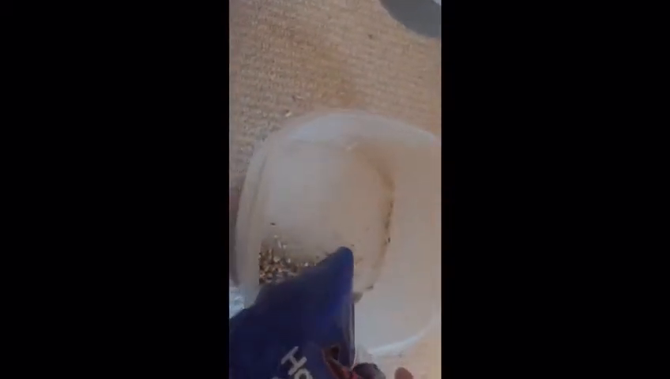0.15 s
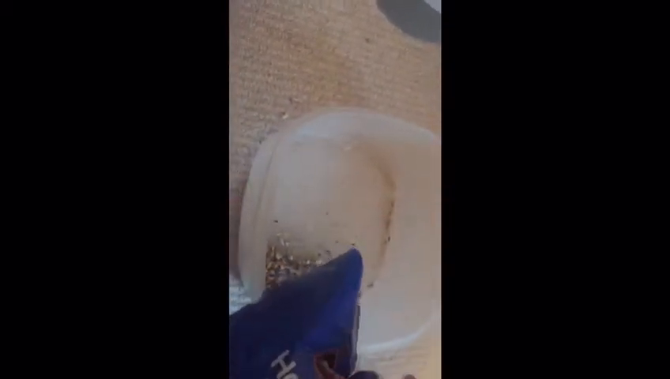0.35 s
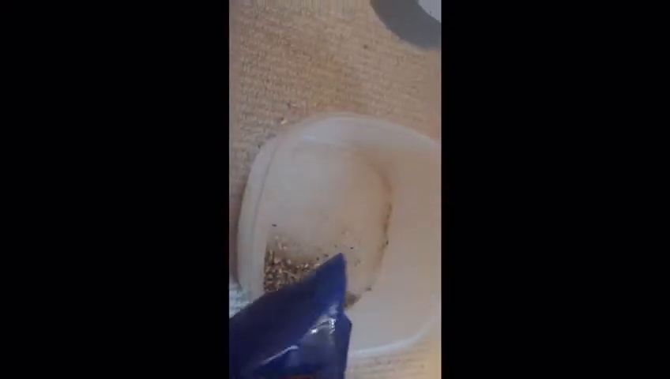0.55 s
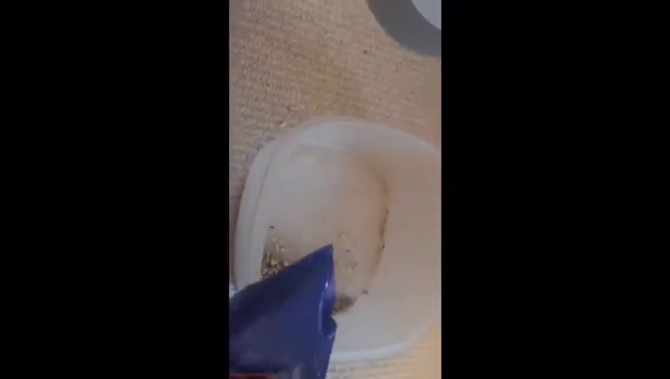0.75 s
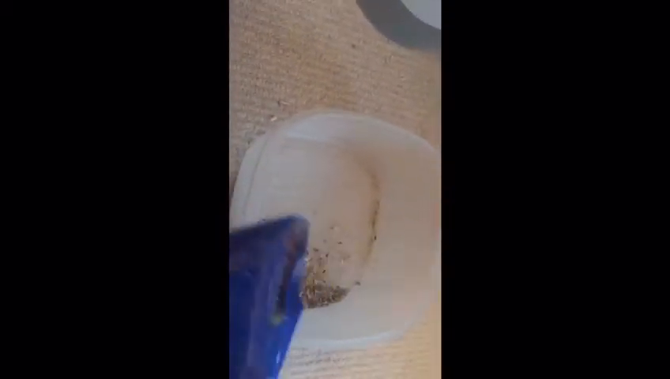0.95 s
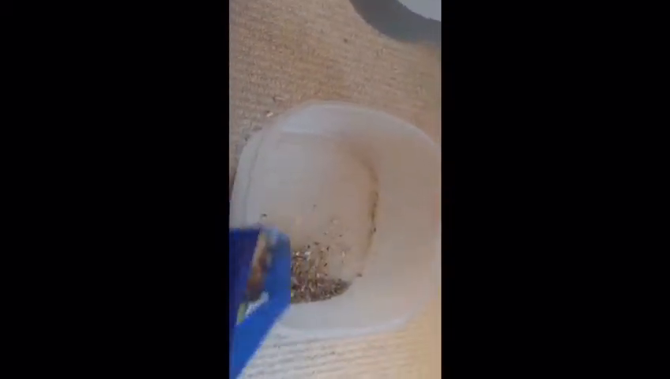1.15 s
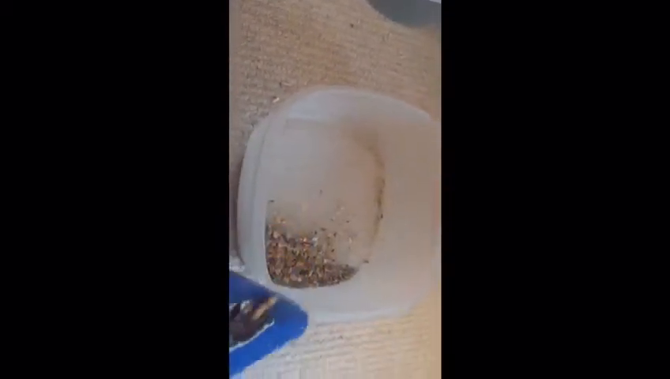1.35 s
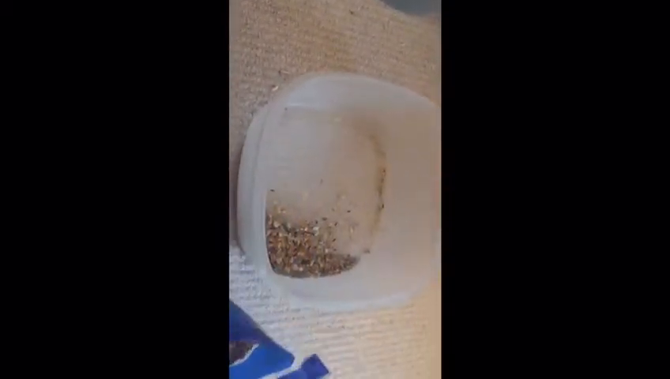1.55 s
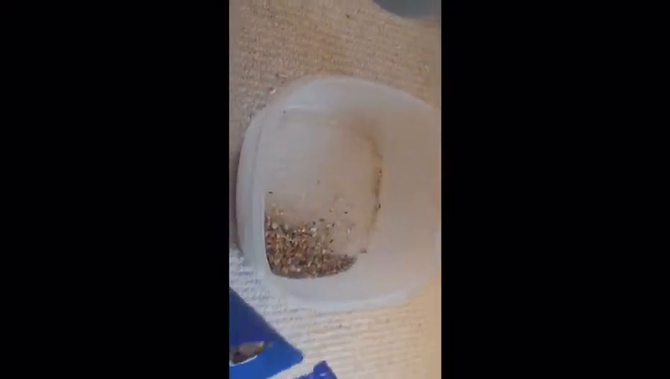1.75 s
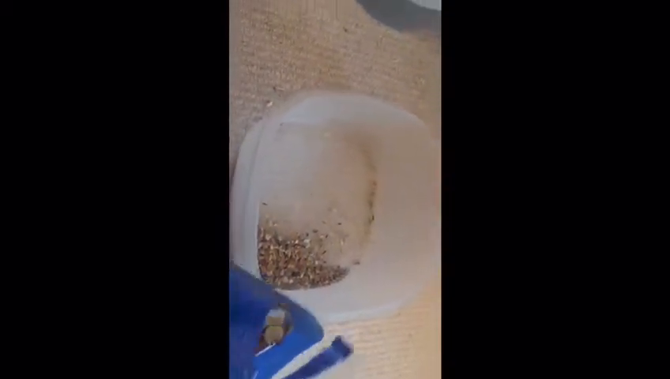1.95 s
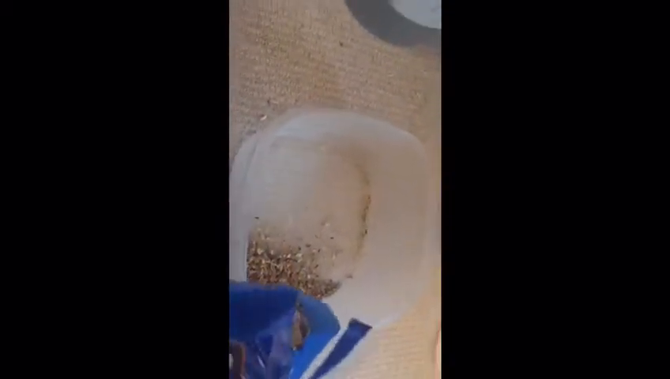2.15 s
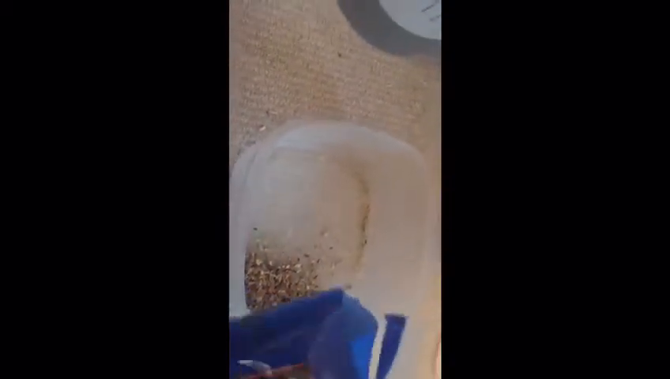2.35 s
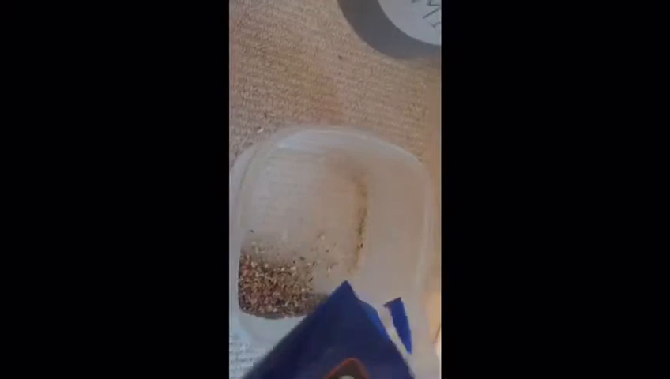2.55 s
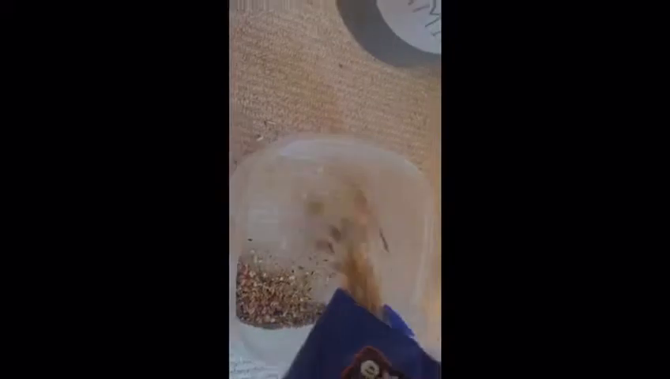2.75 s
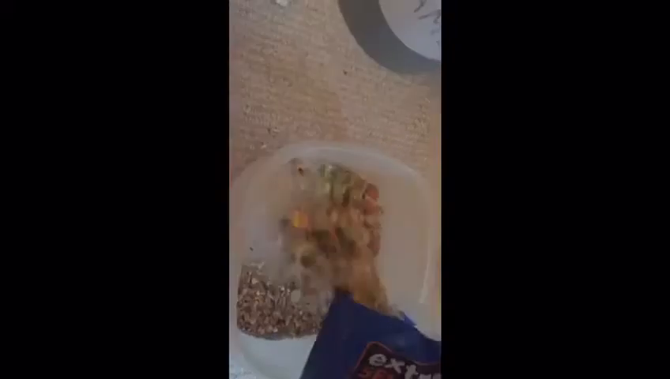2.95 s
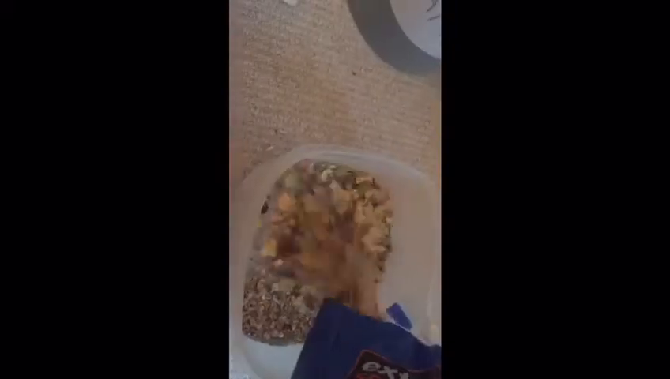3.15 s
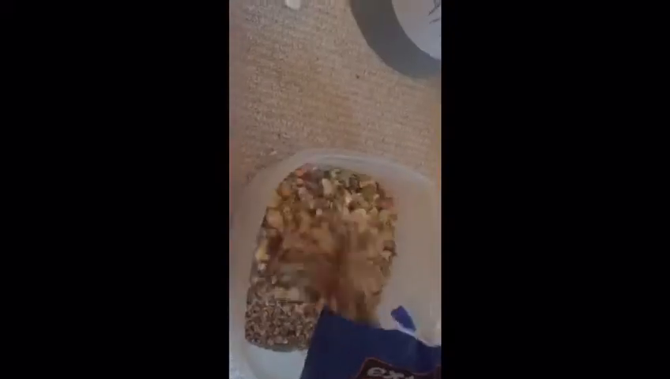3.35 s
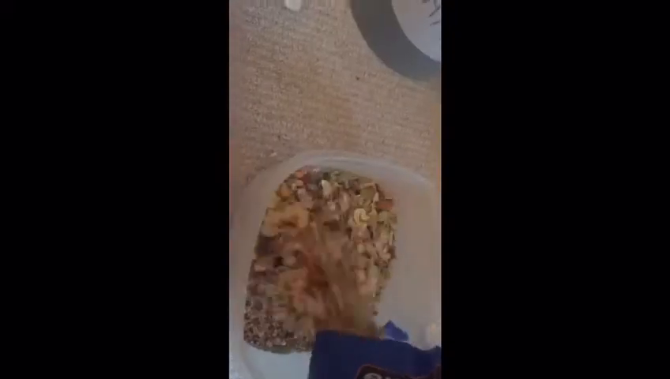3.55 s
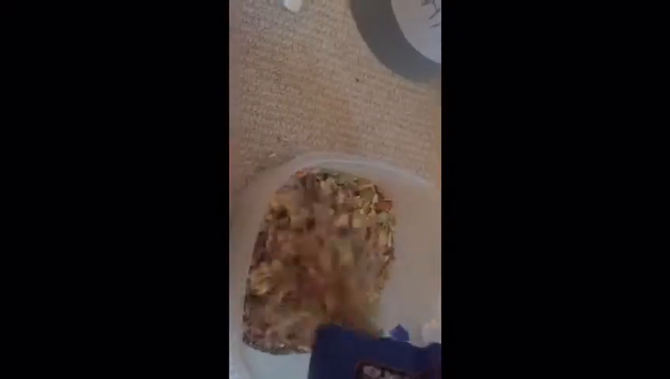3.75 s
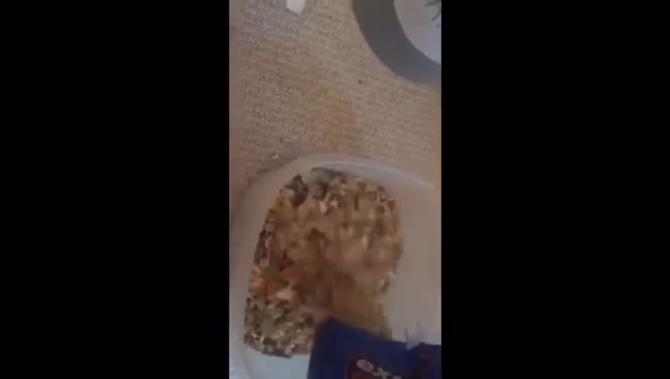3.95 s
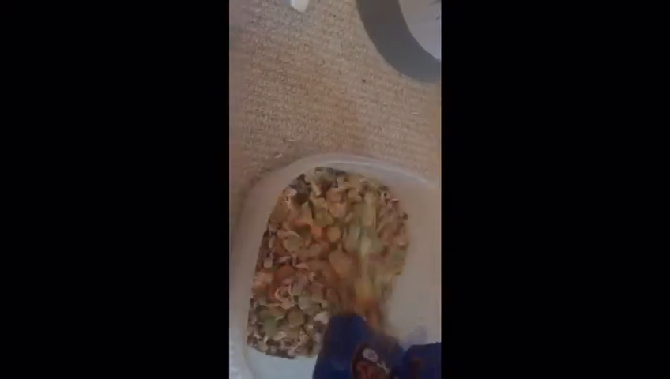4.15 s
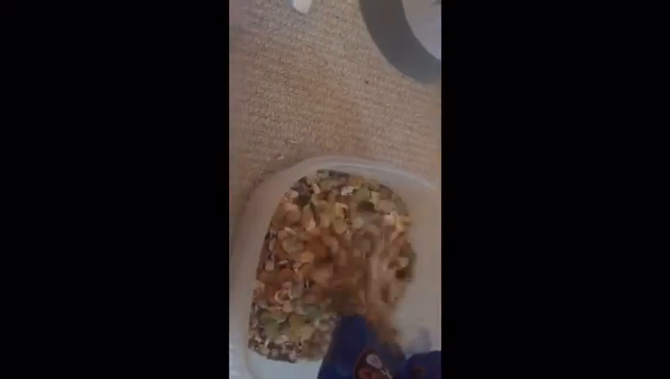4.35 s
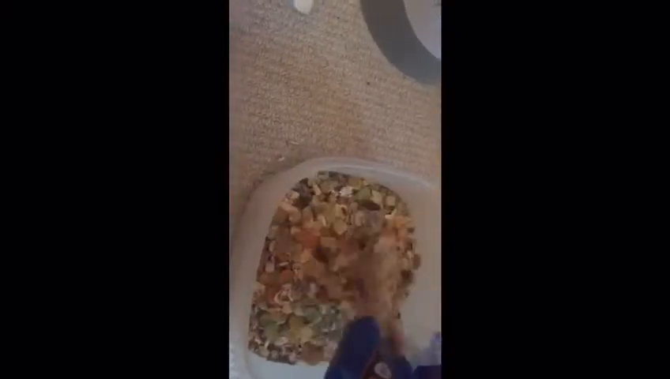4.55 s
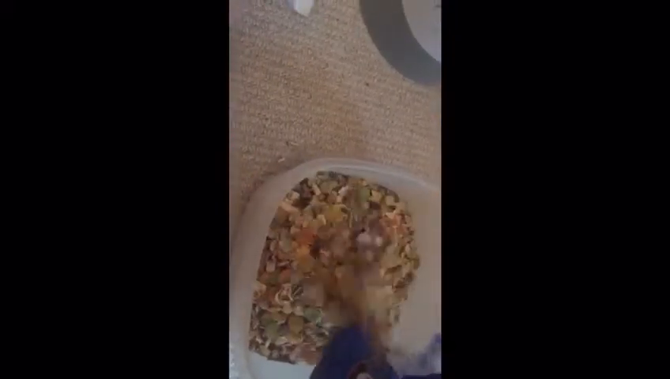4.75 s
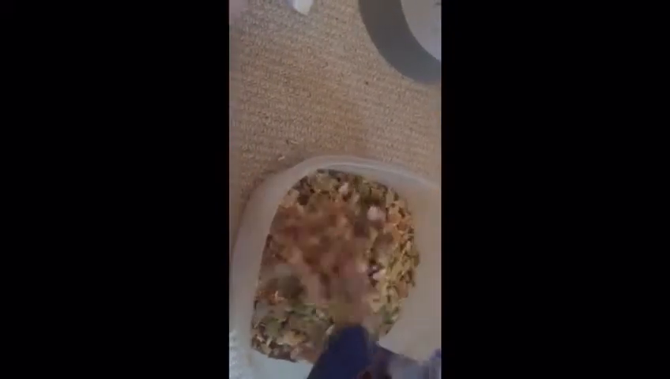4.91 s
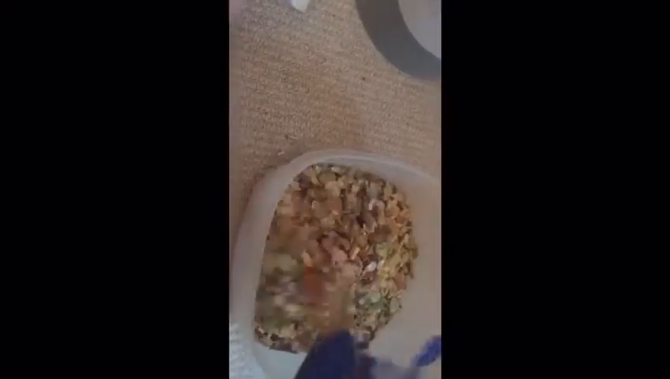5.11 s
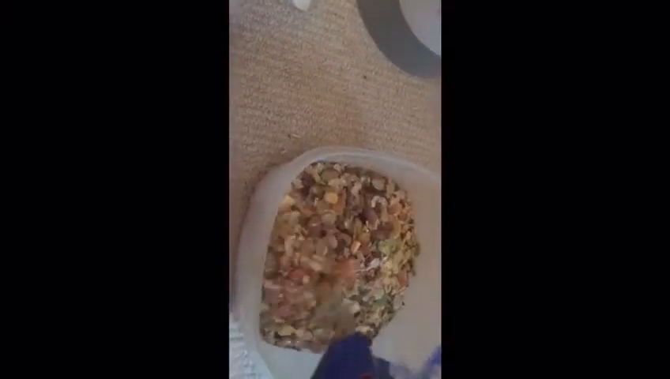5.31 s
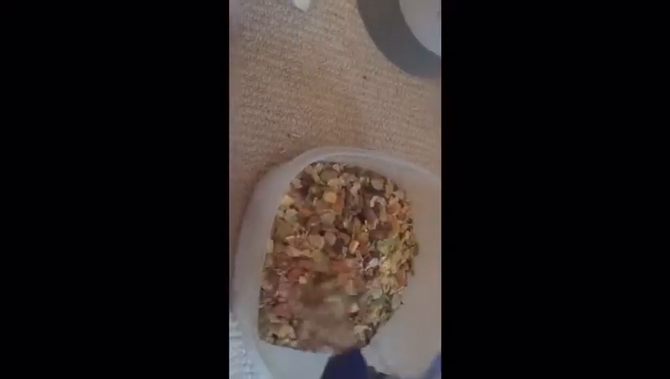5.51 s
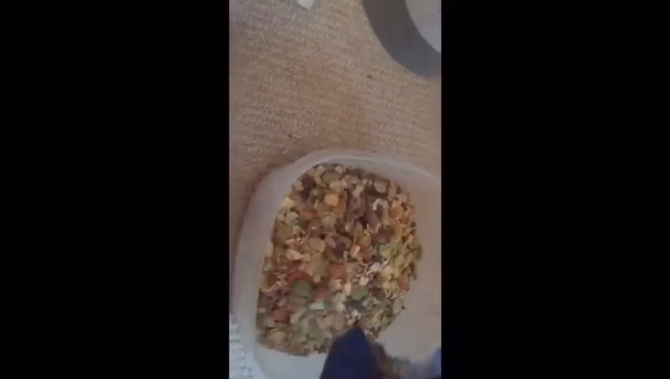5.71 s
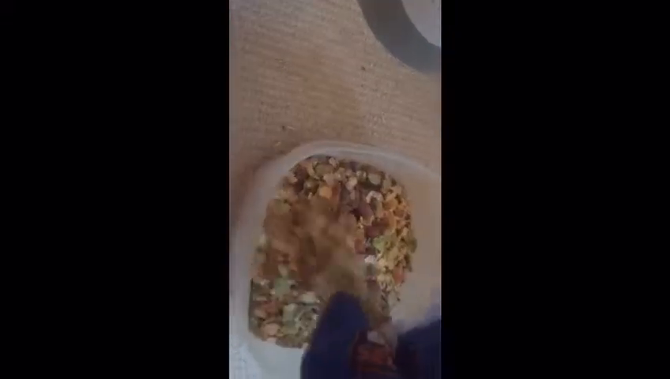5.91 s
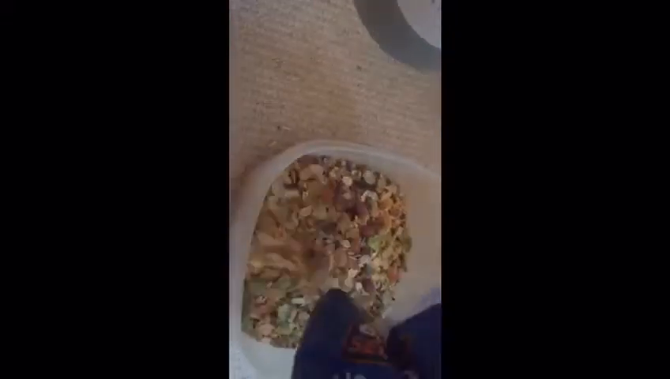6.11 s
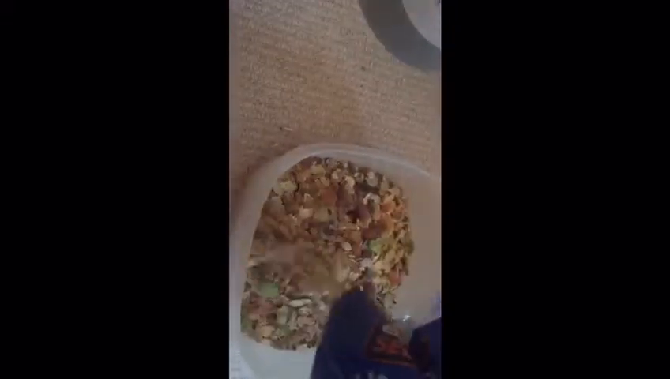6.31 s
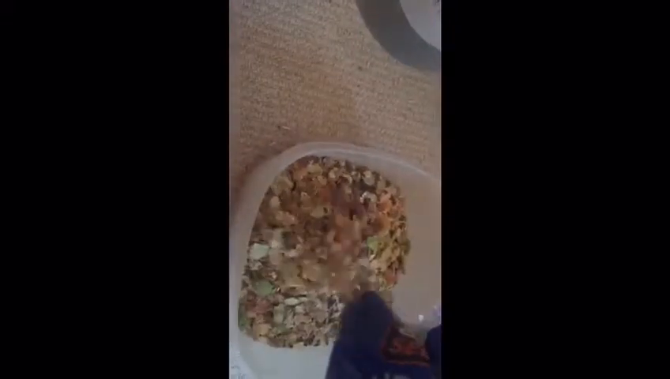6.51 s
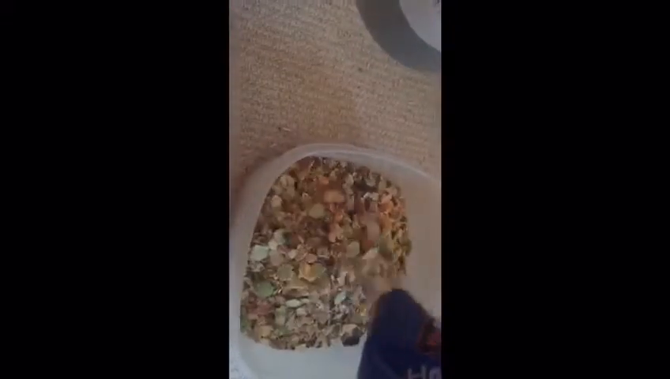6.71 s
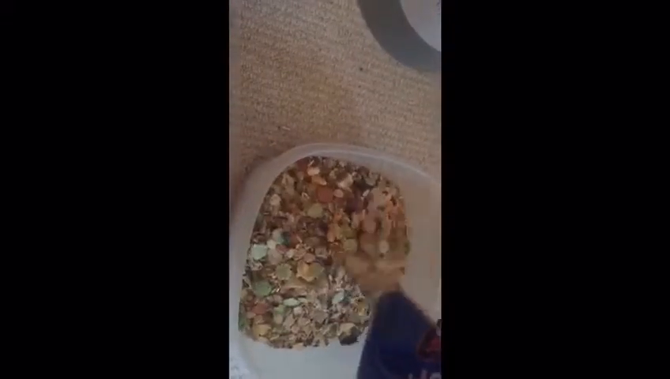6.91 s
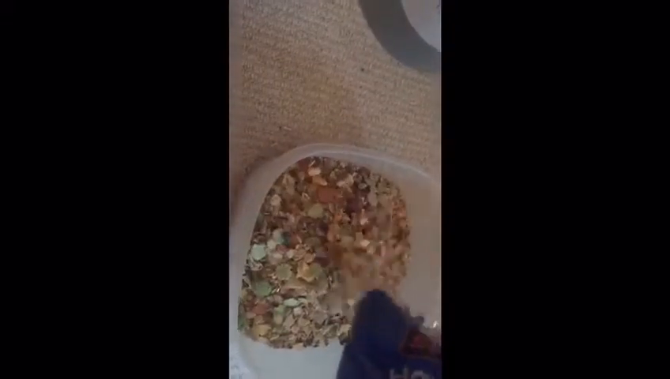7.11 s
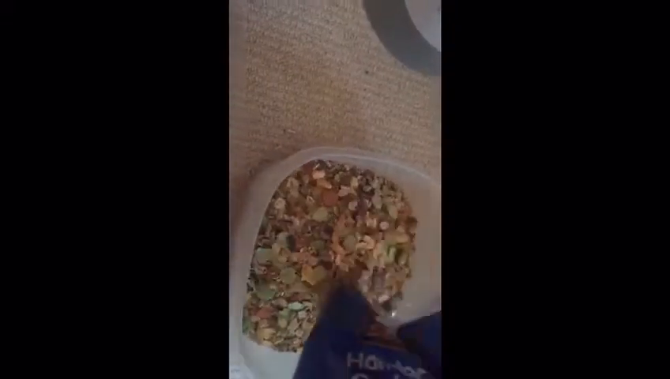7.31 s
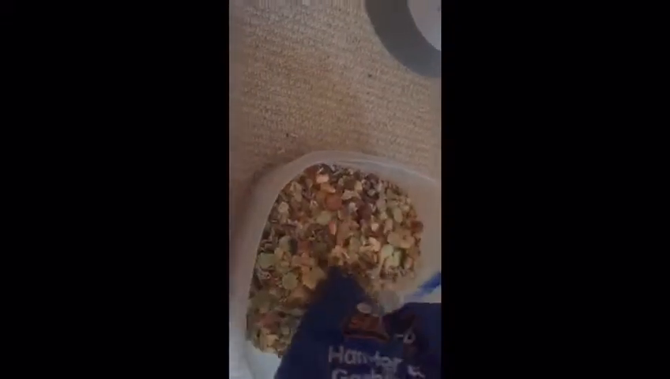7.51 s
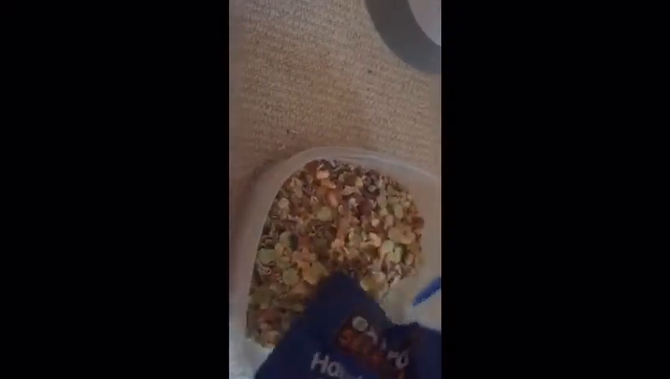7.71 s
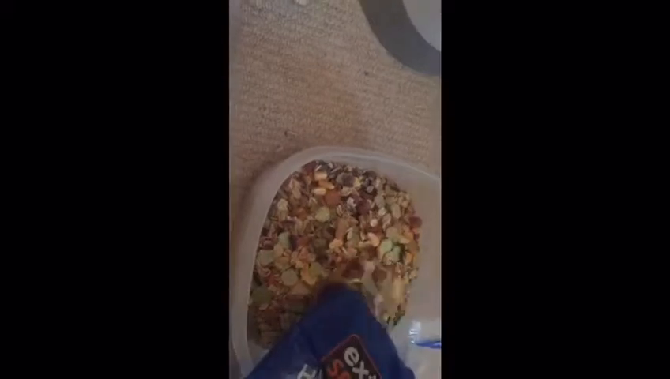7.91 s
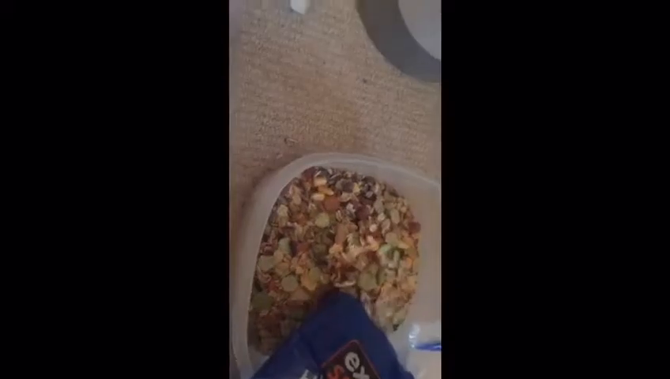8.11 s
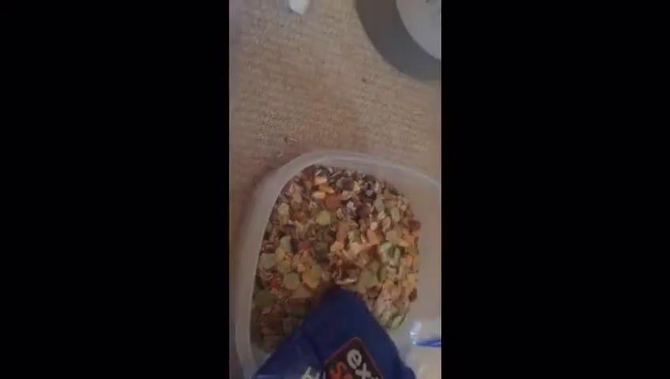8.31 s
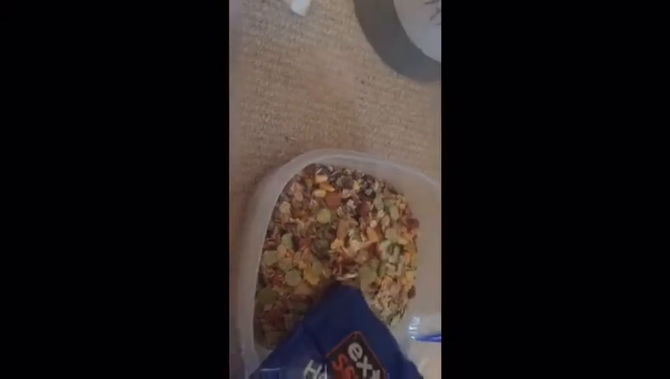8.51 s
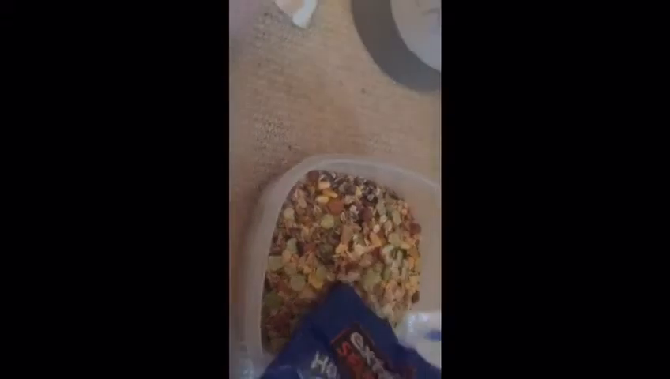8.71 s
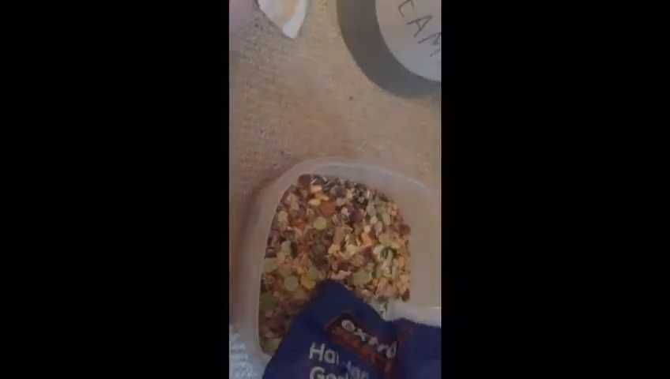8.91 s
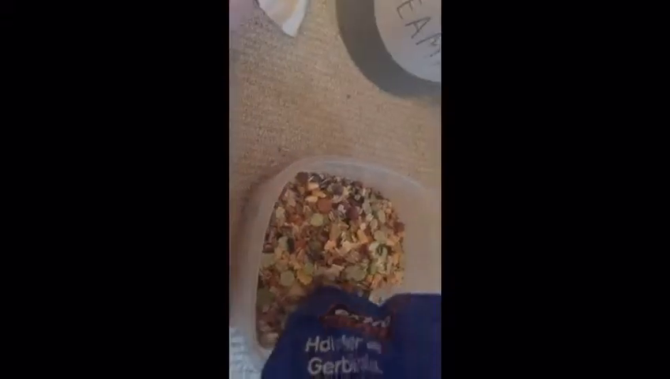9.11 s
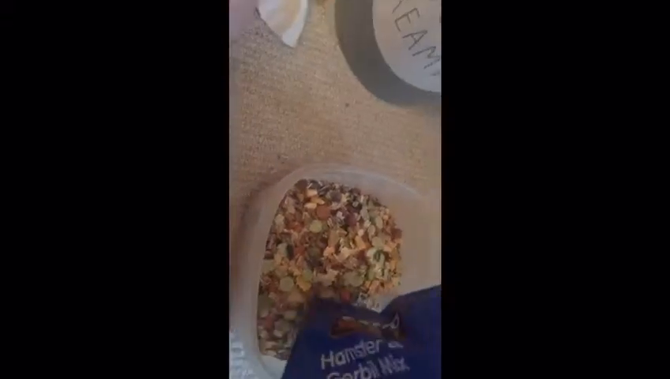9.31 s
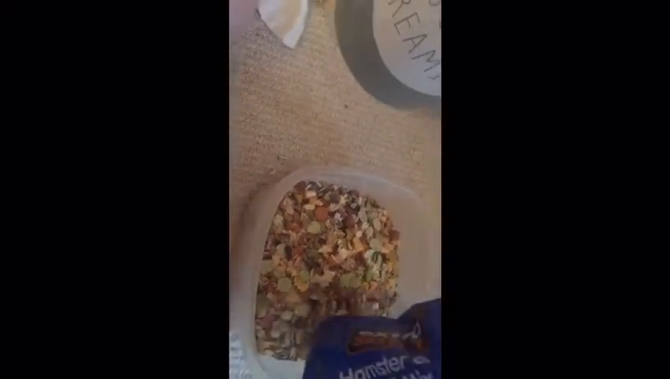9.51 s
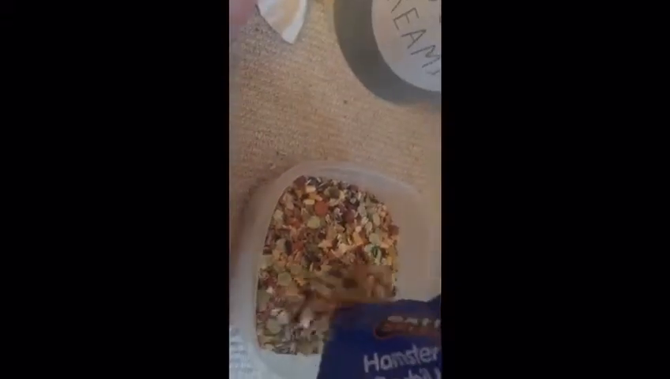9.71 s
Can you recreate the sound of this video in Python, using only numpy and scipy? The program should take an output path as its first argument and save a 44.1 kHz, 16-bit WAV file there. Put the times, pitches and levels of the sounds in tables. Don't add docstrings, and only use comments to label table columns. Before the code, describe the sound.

A stiff plastic bag crackles, then dry seeds and flakes drum into a bare plastic tub, rattle and hiss in gushes, and end in sparse crinkles.

```python
import sys
import numpy as np
from scipy import signal
from scipy.fft import rfft, irfft, next_fast_len
from scipy.io import wavfile
from scipy.ndimage import uniform_filter1d

SR = 44100
rng = np.random.default_rng(int(sys.argv[2]) if len(sys.argv) > 2 else 0)


def natural_amplitude(level_db):
    exponent = np.asarray(level_db, float) / 20
    return 10 ** exponent


def generate_wav(signal):
    frames = np.transpose(np.atleast_2d(signal))
    scaled = np.clip(frames, -1, 1) * 32767
    pcm = np.round(scaled).astype(np.int16)
    wavfile.write(sys.argv[1], SR, pcm)


N = 434826


def rms_one(x):
    return x / np.sqrt(np.mean(x ** 2) + 1e-20)


def peak_one(x):
    return x / np.max(np.abs(x))


def band(x, low_hz, high_hz):
    return signal.sosfilt(signal.butter(2, [low_hz, high_hz], "band", fs=SR, output="sos"), x)


def coloured(x, spectrum):
    size = next_fast_len(N)
    hz, level_db = np.transpose(spectrum)
    bins_hz = np.arange(size // 2 + 1) * SR / size
    gain = natural_amplitude(np.interp(np.log(bins_hz + 1), np.log(hz), level_db))
    return irfft(rfft(x, size) * gain, size)[:N]


def drift(rate):
    r = np.exp(-80 * np.pi * rate / SR)
    slow = signal.lfilter([1], [1, -2 * r, r * r], rng.standard_normal(N // 40 + 2002))[2000:]
    return np.interp(np.arange(N) / 40, np.arange(len(slow)), rms_one(slow))


def ring(clicks, hz, t60):
    r, w = natural_amplitude(-60 / (t60 * SR)), 2 * np.pi * hz / SR
    return signal.lfilter([0, np.sin(w)], [1, -2 * r * np.cos(w), r * r], clicks + 1e-18)


def burst(t60, size):
    return rng.standard_normal(size) * natural_amplitude(-60 * np.arange(size) / SR / t60)


def crack(t60, size):
    t = np.arange(size) / SR - .0014
    front = np.where(t < 0, natural_amplitude(40000 * t), natural_amplitude(-60 * t / t60))
    shudder = natural_amplitude(-13) * np.minimum(1, natural_amplitude(6000 * t)) * natural_amplitude(-60 * t / (6 * t60))
    release = 1 + 1.8 * np.exp(-(t / .00015) ** 2)
    return rng.standard_normal(size) * (front * release + shudder)


def add_at(out, start_s, sound):
    at = round(start_s * SR)
    out[at:at + len(sound)] += sound


# pitch_hz [Hz], level_db [dB per Hz]
GRAIN_TONE = [(18, -53), (30, -40), (125, -7.5), (294, -2.5), (523, -11), (655, -4), (1230, 0.5),
              (1500, -0.5), (2350, 2), (3790, -2), (4990, -5.5), (9580, -3.5), (11100, -3), (12000, -7),
              (15600, -34), (22000, -120)]
BAG_RUB_DB = -8
HANDFUL_DB, HANDFULS_PER_S = .9, 24
PATCH_DB, PATCHES_PER_S = 2.0, 30
FILM_PER_S, STREAM_PER_S = 1300, 3700


def moving_grain():
    rattle_gain, hiss_gain, body_gain, hand_gain = effort()
    per_s, spread_db, bare_db = contact_kind()

    knocks = contacts(per_s, spread_db, clump_db=3.5, t60=0.006)
    lone = seeds(.1 * per_s, spread_db=3.2)
    sharp = contacts(1.1 * per_s, spread_db, clump_db=5.0, t60=0.003)
    ticks = 0.21 * knocks + 0.34 * sharp + 0.3 * lone
    slumps = coloured(contacts(0.06 * per_s, spread_db, clump_db=0.5, t60=0.064), GRAIN_TONE)

    rattle = coloured(knocks + 0.6 * lone, GRAIN_TONE)
    rattle = rms_one(band(band(rattle, 500, 6550), 320, 7600))
    hiss = rms_one(band(coloured(ticks, GRAIN_TONE), 3310, 13800))
    body = rms_one(band(band(slumps, 150, 630), 123, 557))
    hand = rms_one(band(band(slumps, 23.3, 96), 30, 254))
    film_share = (STREAM_PER_S - per_s) / (STREAM_PER_S - FILM_PER_S)
    rubbing = film_share * natural_amplitude(BAG_RUB_DB) * hollows(knocks)

    shared = drift(HANDFULS_PER_S)
    coarse = natural_amplitude(HANDFUL_DB * (.7 * shared + .7 * drift(HANDFULS_PER_S)))
    fine = natural_amplitude(HANDFUL_DB * (.7 * shared + .7 * drift(HANDFULS_PER_S)))
    low = band(rattle, 340, 1940)
    high = rattle - low
    rattle = low * natural_amplitude(PATCH_DB * drift(PATCHES_PER_S)) + high * natural_amplitude(PATCH_DB * drift(PATCHES_PER_S))
    rattle = rattle + rubbing + natural_amplitude(bare_db) * rms_one(tub(knocks))
    return rattle_gain * coarse * rattle + hiss_gain * fine * hiss + body_gain * body + hand_gain * hand


# start_s [s], flow_db [dB], fine_db (fine seed) [dB re flow], slump_db [dB re flow]
TRICKLE = [(0, -50, -6, -19), (.245, -61.5, -1, -6), (.56, -48.5, -7, -9.5), (2.6, -44, -10, -9),
           (2.9, -23.5, 4.5, -12.5), (3.4, -32, 2.5, -7.5), (4.0, -28.5, 1.5, -11.5),
           (4.72, -33.5, 1, -8.5), (4.79, -37, 4, -9), (5.6, -39.5, 1.5, -8), (6.45, -43, 4.5, -8),
           (7.401, -35.5, -0.5, -7.5), (8.148, -32.5, -9.5, -9.5), (8.278, -90, -30, -22),
           (8.62, -74, -14, 7), (9.03, -44, -17.5, -17.5), (9.6, -41, -5.5, -11.5),
           (9.86, -32, -0.5, -17.5)]
# start_s
# (moment of the peak) [s], level_db [dB], length_s [s], fine_db (fine seed) [dB re level], slump_db [dB re
SQUEEZES = [(.01, -43, 0.083, -5, -17), (.152, -47, 0.11, 1, -20), (.315, -54, 0.11, 4, -16),
            (.4, -38, 0.41, -17, -22), (.7, -55, 0.26, -15, 5), (.88, -30, 0.48, -8, -15),
            (1.04, -33, 0.42, -6, -6.5), (1.12, -31.5, 0.56, -7.5, -6.5), (1.32, -39, 0.41, -3.5, 1.5),
            (1.44, -31, 0.16, -0.5, -1.5), (1.6, -25, 0.26, -4.5, -6), (1.68, -26.5, 0.12, -10, -3.5),
            (1.83, -38, 0.86, -4, -8), (2.087, -30, 0.31, -2.5, -3.5), (2.223, -40.5, 0.082, 8.5, -21),
            (2.317, -41.5, 0.18, 5, -8), (2.4, -33.5, 0.13, -10, -15), (2.5, -29.5, 0.34, -5.5, -12.5),
            (2.67, -28.5, 0.16, -2, -9.5), (2.77, -35, 0.61, 1, -4),
            (8.2, -33.5, 0.12, -25, -10),
    (8.321, -47, 0.061, -23, -1),
    (8.408, -41.5, 0.25, -13, -0.5),
    (8.544, -49.5, 0.11, -18, -1),
    (8.69, -47, 0.14, -32, 1),
    (8.821, -26, 0.34, -7, -5),
    (8.93, -37.5, 0.36, -4, -4),
    (9.161, -38.5, 1, -2, -4),
    (9.33, -57, 0.34, -14, -20),
    (9.42, -34.5, 0.76, -3, -8.5),
]
# start_s (moment of the peak) [s], level_db
# [dB], length_s [s], fine_db [dB re level], slump_db [dB re level]
GUSHES = [
    (2.856, -26.5, 1.3, -14, -22),
    (4.3, -49, 0.27, -20, -24),
    (4.965, -33, 0.6, 1.5, -16),
    (5.7, -33, 0.087, -18, -24),
    (5.87, -30.5, 3.6, 2, -9.5),
    (6.66, -30.5, 0.14, -2, -5),
    (6.86, -32.5, 0.51, -1.5, -6),
    (7.05, -33.5, 0.69, 3.5, -27),
    (7.5, -27.5, 0.26, -6, -19),
    (7.89, -24, 0.41, -8.5, -12.5),
]


def effort():
    t = np.arange(0, N + 64, 64) / SR
    s, *columns = np.transpose(TRICKLE)
    flow_db, fine_db, slump_db = (np.interp(t, s, column) for column in columns)
    body_db = flow_db + slump_db
    power = natural_amplitude(2 * np.array([flow_db, flow_db + fine_db, body_db, body_db - 12.5]))
    kinds = ((SQUEEZES, 0.49, -7.5), (GUSHES, 0.1, -18))
    for rows, rise, hand_db in kinds:
        for start_s, level_db, length_s, fine_db, slump_db in rows:
            away = np.maximum((start_s - t) / rise, (t - start_s) / (1 - rise)) / length_s
            shape_db = level_db - 30 * away
            layers_db = np.array([[0], [fine_db], [slump_db], [slump_db + hand_db]])
            power += natural_amplitude(2 * shape_db) * natural_amplitude(2 * layers_db)
    return [np.interp(np.arange(N) / SR, t, np.sqrt(p)) for p in power]


POUR_S, TURN_S = (2.95, 8.2), 0.17
FILM_SPREAD_DB, STREAM_SPREAD_DB = 2.5, 2
BARE_S = (2.81, 3.245)
BARE_DB, BURIED_DB, BURY_DB_PER_S = -0.5, -39, 96


def contact_kind():
    t = np.arange(N) / SR
    stream = np.clip(np.minimum(t - POUR_S[0], POUR_S[1] - t) / TURN_S + .5, 0, 1)
    outside_s = np.maximum(np.maximum(10 * (BARE_S[0] - t), t - BARE_S[1]), 0)
    per_s = FILM_PER_S + (STREAM_PER_S - FILM_PER_S) * stream
    spread_db = FILM_SPREAD_DB + (STREAM_SPREAD_DB - FILM_SPREAD_DB) * stream
    return per_s, spread_db, np.maximum(BARE_DB - BURY_DB_PER_S * outside_s, BURIED_DB)


def contacts(per_s, spread_db, clump_db, t60):
    born = rng.random(N) < per_s * natural_amplitude(clump_db * drift(18)) / SR
    energy = born * natural_amplitude(2 * spread_db * np.minimum(rng.exponential(1, N), 4.5))
    energy = signal.lfilter([1], [1, -natural_amplitude(-120 / (t60 * SR))], energy) + 1e-6
    energy = energy / uniform_filter1d(energy, size=SR // 14)
    return np.sqrt(energy + 0.15) * rng.standard_normal(N)


def seeds(per_s, spread_db):
    born = rng.random(N) < per_s * natural_amplitude(4 * drift(12)) / SR
    sizes = natural_amplitude(spread_db * np.minimum(rng.exponential(1, N), 4))
    clicks = born * sizes * rng.choice([-1, 1], N)
    dealt = rng.integers(0, 12, N)
    rings = 3.3 * clicks
    for k, hz in enumerate(np.geomspace(1200, 11000, num=12)):
        rings = rings + ring(clicks * (dealt == k), hz, 2.7 / hz + 0.0017)
    return rings / np.sqrt(uniform_filter1d(rings ** 2, size=SR // 3) + 1e-9)


# pitch_hz [Hz], width_hz [Hz], level_db [dB]
BAG_HOLLOWS = [(1040, 116, -2.5), (1870, 86, 9), (2484, 200, -4), (3416, 63, -0.5), (4340, 140, -5),
               (5370, 89, -3), (6030, 750, -3)]


def hollows(x):
    out = np.zeros(N)
    for k, (hz, width_hz, level_db) in enumerate(BAG_HOLLOWS):
        hollow = signal.lfilter(*signal.iirpeak(hz, hz / width_hz, fs=SR), x)
        out += natural_amplitude(level_db) * hollow * (-1) ** k
    return rms_one(out)


# pitch_hz [Hz], level_db [dB], t60_s (time to fade by 60 dB) [s]
TUB_MODES = [(397, -13, 0.046), (472, 0, 0.023), (690, -1, 0.032), (1080, -9.5, 0.053), (1330, 4.5, 0.029),
             (2070, -2, 0.022), (2330, 2, 0.0064), (3460, 5.5, 0.015), (4510, 7.5, 0.0027),
             (8780, 5.5, 0.0069)]


def tub(strikes):
    out = np.zeros(N)
    for hz, level_db, t60 in TUB_MODES:
        out += natural_amplitude(level_db) * ring(strikes, hz, 0.5 * t60)
    return band(out, 270, 21000)


# start_s [s], level_db (peak) [dB],
# bright_db (bright crack) [dB re peak]
FIRST_FLAKES = [(0.306, -13.5, -24), (2.758, -6.5, -6), (2.788, -12, -7), (2.794, -29, 7), (2.806, 6, -30),
                (2.814, 0.5, -15), (2.84, 10, -20), (2.847, 13, -9), (2.852, -5, -6), (2.861, 3, -15),
                (2.87, 7, -39), (2.878, 1, -22), (2.885, -10, -6), (2.89, 3.5, -7), (2.915, -7, -8),
                (2.924, 5, -21), (2.936, 3, -10), (2.952, -11, -13), (2.996, -8, -20), (3.002, 0, -23),
                (3.181, -10, -28)]


def flakes():
    out, size = np.zeros(N + 4096), 4096
    for start_s, level_db, bright_db in FIRST_FLAKES:
        touch = crack(0.00071, size)
        drum = sum(natural_amplitude(mode_db + rng.normal(0, 3.4)) * ring(touch, hz, t60) for hz, mode_db, t60 in TUB_MODES)
        drum = peak_one(band(drum, 690, 14000))
        broad = peak_one(band(crack(0.014, size), 890, 4060))
        tick = peak_one(band(crack(.004, size), 5500, 13000))
        hit = 0.36 * drum + .5 * broad + natural_amplitude(bright_db + 7.5) * tick
        add_at(out, start_s, natural_amplitude(level_db + 3) * hit)
    return out[:N]


# start_s [s], level_db (peak) [dB],
# pitch_hz [Hz]
SINGLE_TICKS = [(3.012, -11, 1330), (3.0644, -9, 1400), (3.1268, -10, 1300), (3.246, -12, 2890),
                (3.2697, -19, 3050), (3.3847, -17, 2070), (3.432, -6, 9170), (3.4696, -7, 10000),
                (3.704, -19, 1100), (3.7834, -24, 3800), (3.7914, -18, 2180), (3.8166, -16, 1640),
                (4.0494, -15, 1080), (4.2413, -8.5, 3020), (4.2804, -16, 1200), (4.503, -13, 1230),
                (4.526, -15, 1180), (4.585, -25, 1820), (4.664, -17, 2000), (4.7195, -19, 1930),
                (4.7294, -11, 1940), (4.739, -23, 1040), (4.776, -25, 1930), (4.9023, -18, 1960),
                (4.9366, -15, 9740), (4.9647, -9.5, 3510), (5.1, -23, 1430), (5.1888, -14, 3400),
                (5.2574, -17, 2800), (5.3423, -21, 2960), (5.4575, -15, 8840), (5.5099, -29, 1160),
                (5.5942, -20, 11200), (5.6181, -15, 8830), (5.6797, -18, 2150), (5.7957, -19, 1430),
                (5.8641, -7.5, 5800), (6.0394, -13, 3820), (6.0654, -14, 3650), (6.1574, -23, 3650),
                (6.1863, -24, 1660), (6.2143, -11.5, 3510), (6.274, -1, 11100), (6.3024, -35.5, 9710),
                (6.348, -23, 3660), (6.466, -17, 3850), (6.571, -20, 1750), (6.7513, -26, 2570),
                (6.8456, -17, 3140), (6.9184, -24, 1280),
                (0.2653, -34, 2860), (0.2826, -20, 2200), (0.54, -29, 4740), (0.5786, -32, 3040),
                  (0.811, -26, 1130), (0.8425, -20, 1960), (0.855, -16, 2080), (0.9308, -26, 1840),
                  (0.9687, -15.5, 2250), (0.9886, -20, 2140), (1.2157, -24, 1850), (1.2366, -21, 1860),
                  (1.3574, -17, 4630), (1.3902, -24, 2230), (1.403, -19, 3560), (1.476, -20, 2370),
                  (1.524, -16, 1820), (1.5743, -8, 2250), (1.7667, -20, 2300), (7.0868, -36, 2260),
                  (7.2837, -24, 4100), (7.314, -21, 4160), (7.3626, -17, 2140), (7.6011, -24, 3570),
                  (7.707, -16, 2450), (7.8416, -13, 2500), (7.872, -18, 1170), (8.0292, -11, 2590),
                  (8.1226, -28, 1160), (8.2644, -25, 1560), (8.317, -34, 1730), (8.4078, -29, 1890),
                  (8.4616, -33, 2700), (8.5709, -42, 1823), (8.668, -22, 1710), (8.7021, -27, 1510),
                  (8.7231, -25, 2110), (8.746, -19, 1550), (8.8665, -12, 1700), (8.9491, -19, 1290),
                  (8.9718, -18, 1350), (8.998, -28, 1500), (9.0194, -29, 1870), (9.0438, -34, 2230),
                  (9.1644, -20, 2400), (9.2944, -36, 1340), (9.361, -24, 1600), (9.3796, -26, 1570),
                  (9.525, -27, 1940), (9.704, -23, 1660),
                (1.048, -16, 8740), (1.0809, -27, 6560), (1.3174, -25, 8530), (1.4227, -25, 8970),
                  (4.7914, -22, 9120), (4.8044, -22, 9720), (5.0998, -10, 9480), (5.1114, -14, 8710),
                  (5.1956, -17, 11000), (5.2776, -10.5, 9860), (6.219, -21, 8780), (6.2582, -6, 11300),
                  (6.2844, -27, 9090), (6.457, -15.5, 9340), (6.5745, -16, 8990), (6.7296, -27, 8960),
                (0.315, -24, 6000),
    (0.388, -18, 3000),
    (1.105, -17, 9000),
    (1.110, -20, 6000),
    (2.836, -12, 1330),
    (5.220, -16, 9000),
    (6.265, -17, 10000),
]


def ticks_alone():
    out, size = np.zeros(N + 1024), 1024
    for start_s, level_db, hz in SINGLE_TICKS:
        hit = crack(0.006 + 7.5 / hz, size)
        narrow = peak_one(band(hit, 0.82 * hz, 1.223 * hz))
        wide = band(hit, .5 * hz, min(2.46 * hz, 13000))
        wide = peak_one(band(wide, 0.61 * hz, min(3.3 * hz, 15000)))
        add_at(out, start_s, natural_amplitude(level_db - 8) * (narrow + 0.97 * wide))
    return out[:N]


# start_s [s],
# level_db (peak) [dB], pitch_hz [Hz], bright_db (bright crack) [dB re peak]
CREASE_SNAPS = [(0.059, -27.5, 4510, -34), (0.306, -14.5, 2000, -17), (0.368, -26, 4540, -32),
                (0.391, -15, 3300, -8.5), (0.455, -19.5, 2820, -26), (0.602, -20.5, 2950, -22),
                (0.675, -27.5, 2800, -11), (0.745, -26, 1540, -37), (0.8, -20.5, 1130, 1.5),
                (0.88, -17, 1970, 1), (0.898, -7.5, 3070, 2), (1.023, -17, 2480, -22),
                (1.044, -12.5, 2000, -12), (1.119, -8, 3600, -4.5), (1.168, -16, 2340, -16),
                (1.274, -14, 2150, -3), (1.303, -20.5, 2100, -2.5), (1.332, -18.5, 3080, -27),
                (1.363, -21, 4570, -27), (1.433, -16, 2080, -3), (1.443, -14, 2500, -18),
                (1.497, -20, 2260, -2),
                (1.553, -11, 2820, -2), (1.586, -9, 3460, -21), (1.605, -5.5, 2150, -10),
                 (1.626, -12, 2370, -23), (1.652, -12.5, 3350, -13), (1.676, -9, 2530, 2),
                 (1.785, -9.5, 3940, -7), (1.82, -19, 3040, 1.5), (1.974, -15.5, 3260, 0.5),
                 (2.02, -17, 2290, -21), (2.038, -16, 1980, -8), (2.071, -11, 3740, -21),
                 (2.093, -12.5, 2070, -4), (2.16, -11.5, 3400, -37), (2.232, -17.5, 1610, -5.5),
                 (2.387, -9.5, 3900, 0.5), (2.438, -14.5, 1660, -17), (2.485, -7, 3170, -20),
                 (2.564, -12.5, 6140, -8), (2.638, -20, 3600, -27), (2.703, -15, 1360, -21),
                (3.512, -22, 2700, -2), (3.54, -16, 930, -15), (3.879, -23, 2490, 3),
                 (3.955, -14.5, 2610, -18), (4.294, -12.5, 1210, -24), (4.334, -15.5, 2670, -42),
                 (4.998, -14.5, 1400, -12), (5.075, -26, 3300, 6.5), (5.209, -14.5, 3740, -2),
                 (5.315, -17.5, 2500, -29), (5.372, -20, 3400, -24), (5.65, -13.5, 2890, -8),
                 (6.106, -25, 1190, -24), (6.252, -19.5, 3000, -8), (6.259, -34, 3700, -11.5),
                 (6.295, -34, 3760, 0), (6.387, -26, 1300, -23), (6.505, -28, 960, 8),
                 (6.541, -21, 4530, -2.5), (6.593, -17, 989, -6), (6.656, -13.5, 2600, -26),
                 (6.767, -20, 1270, -23), (7.003, -14.5, 1230, -16), (7.051, -15.5, 3700, -22),
                 (7.46, -17.5, 1200, -3), (7.483, -15, 1990, -0.5), (7.545, -15.5, 2100, -22),
                 (7.98, -15, 1830, -32),
                (8.258, -35.5, 1622, -27), (8.363, -33, 1690, -34), (8.513, -32.5, 1350, -26),
              (8.54, -21.5, 1760, -32), (8.642, -35.5, 1160, -31), (8.675, -22.5, 1450, -34),
              (8.767, -24, 1470, -8), (8.788, -18, 1630, -25), (8.807, -4, 2230, -4.5),
              (8.818, -10, 2380, 1), (8.889, -10, 2770, -15), (8.93, -22, 1150, -27),
              (9.072, -9.5, 2150, -11), (9.102, -22, 1330, -10), (9.134, -5, 2200, -6),
              (9.154, -18.5, 2740, -17), (9.229, -20, 2370, -18), (9.251, -12, 4920, -26),
              (9.269, -23.5, 1285, -6), (9.406, -21, 2180, -15), (9.422, -15, 2920, -12),
              (9.472, -34, 1400, -2), (9.635, -22, 3800, -17),
                (0.417, -24, 2400, -32),
    (0.433, -21, 2420, -28),
    (2.081, -19, 2520, -15),
    (2.124, -23, 1940, -19),
    (2.42, -17, 2720, -22),
    (2.491, -16.5, 1300, -3),
    (2.511, -19, 2720, -19),
    (7.179, -21, 2700, -2),
    (2.398, -13, 2620, -31),
]


def snaps():
    out, size = np.zeros(N + 4096), 4096
    rows = CREASE_SNAPS
    for start_s, level_db, hz, bright_db in rows:
        t60 = .003 + 5 / hz
        patch = peak_one(band(crack(1.43 * t60, size), 0.85 * hz, 1.186 * hz))
        low_hz = max(0.41 * hz, 890)
        dull_db = 0.35 * min(bright_db + 19.5, 0)
        high_hz = np.clip(3.48 * hz * natural_amplitude(dull_db), 1.5 * hz, 9000)
        broad = band(crack(2.4 * t60, size), low_hz, high_hz)
        broad = peak_one(band(broad, 0.82 * low_hz, high_hz))
        tick = peak_one(band(band(crack(.003, size), 5000, 12500), 4000, 15000))
        push = peak_one(band(burst(0.022, size), 200, 410))
        snap = 0.81 * patch + 1.14 * broad + natural_amplitude(bright_db + 8.5) * tick + natural_amplitude(-24) * push
        add_at(out, start_s, natural_amplitude(level_db) * snap)
    return out[:N]


# start_s [s], level_db (peak) [dB], pitch_hz [Hz]
BAG_BUMPS = [
    (0.307, -29, 426),
    (0.602, -19, 384),
    (0.987, -18, 328),
    (6.591, -19.5, 280),
    (6.655, -20, 237),
    (8.195, -18.5, 250),
]


def bumps():
    out, size = np.zeros(N + 4096), 4096
    for start_s, level_db, hz in BAG_BUMPS:
        knock = peak_one(band(crack(0.017, size), 0.56 * hz, 1.32 * hz))
        add_at(out, start_s, natural_amplitude(level_db - 6) * knock)
    return out[:N]


def room(x):
    tail = band(burst(t60=.1, size=8192), 210, 5000)
    return signal.fftconvolve(x, tail / np.sqrt(np.sum(tail ** 2)))[:N]


# pitch_hz [Hz], level_db [dB per Hz]
AIR_TONE = [(18, -36), (30, 25), (142, 14), (259, -10), (333, -4), (439, 12), (761, -32), (1700, 9),
            (5520, -44), (12000, -40), (15600, -60), (22000, -120)]


def room_air():
    return natural_amplitude(-66.5) * rms_one(coloured(rng.standard_normal(N), AIR_TONE))


def scene():
    grain = moving_grain()
    blows = flakes() + ticks_alone() + snaps() + bumps()
    return (grain + blows + natural_amplitude(-19) * room(blows) + room_air())[None]


# pitch_hz [Hz], width_hz [Hz], depth [share, 0-1]
HOUSING_NOTCHES = [(4920, 200, 0.4), (7480, 1850, 0.23), (10590, 1940, 0.46)]


def housing(x):
    for hz, width_hz, depth in HOUSING_NOTCHES:
        x = x - depth * signal.lfilter(*signal.iirpeak(hz, hz / width_hz, fs=SR), x)
    return x


def band_limit(x):
    return signal.sosfilt(signal.butter(12, 12440, fs=SR, output="sos"), x)


def record(dry):
    thin = signal.sosfilt(signal.butter(2, 45, "high", fs=SR, output="sos"), housing(dry))
    squeezed = .84 * np.tanh(thin / .84)
    top = signal.ellip(8, .3, 50, 11700, fs=SR, output="sos")
    clipped = np.clip(signal.sosfilt(top, squeezed), -.88, .88)
    mix = np.clip(signal.sosfilt(top, clipped), -1, 1)
    return band_limit(mix)


dry = scene()
out = record(dry)
generate_wav(out)
```